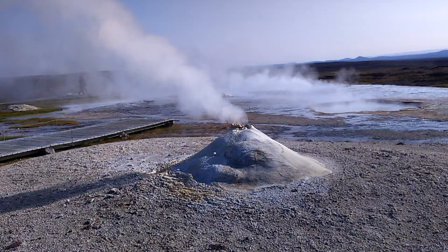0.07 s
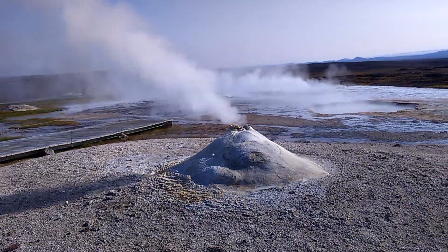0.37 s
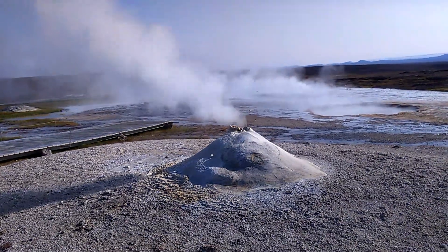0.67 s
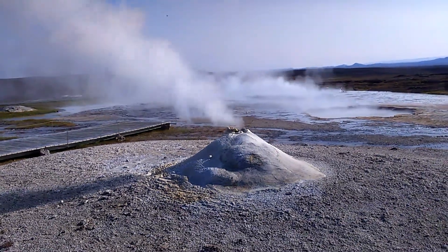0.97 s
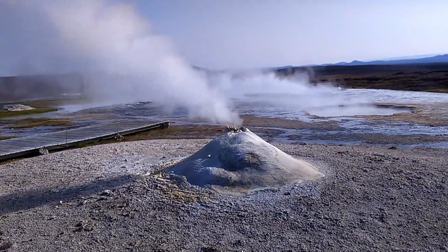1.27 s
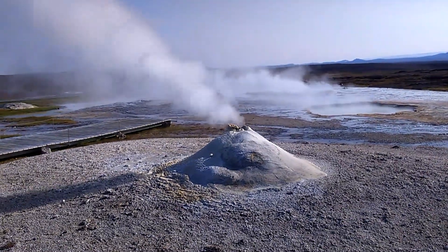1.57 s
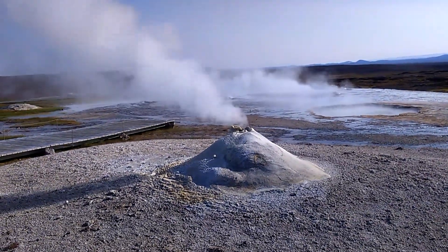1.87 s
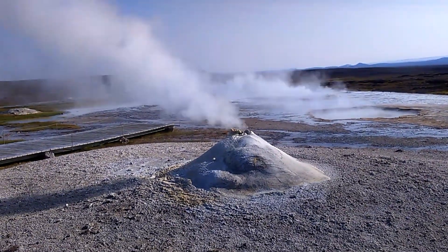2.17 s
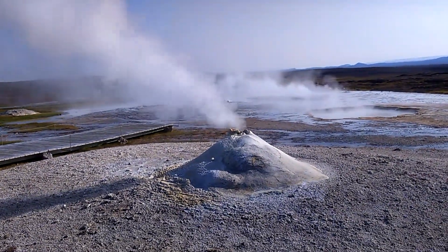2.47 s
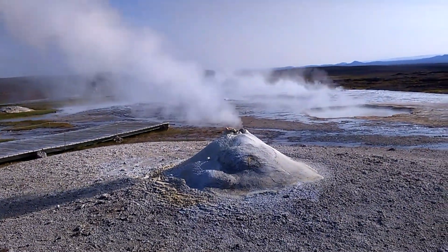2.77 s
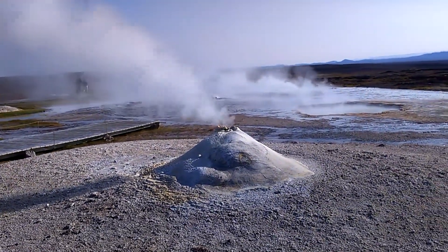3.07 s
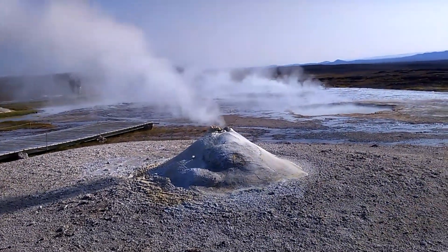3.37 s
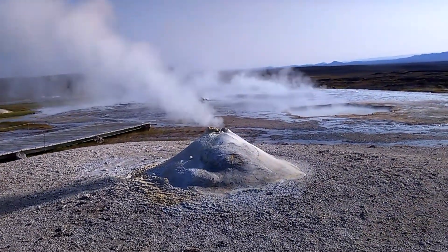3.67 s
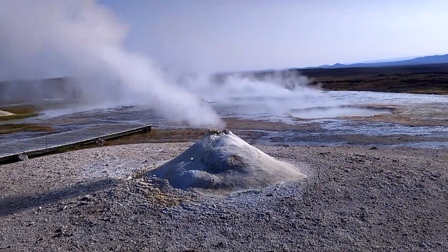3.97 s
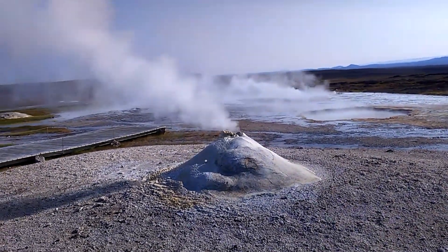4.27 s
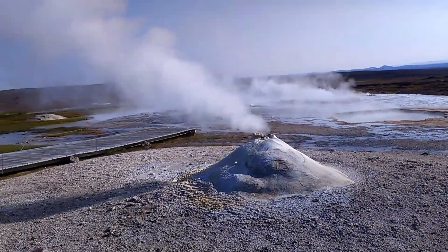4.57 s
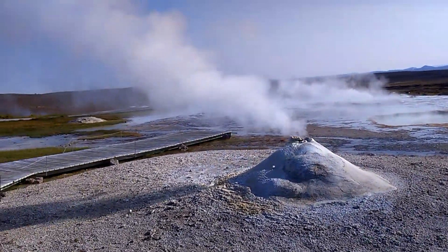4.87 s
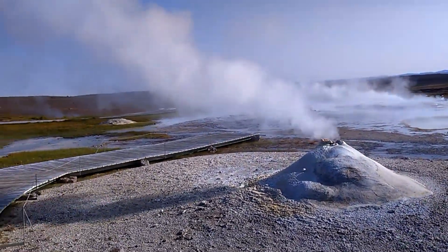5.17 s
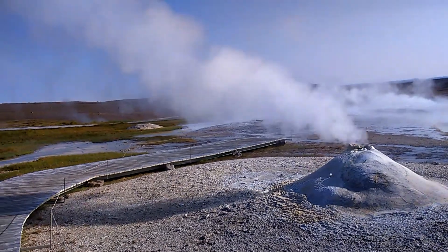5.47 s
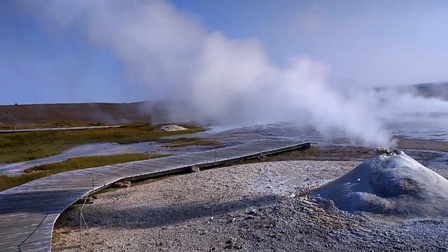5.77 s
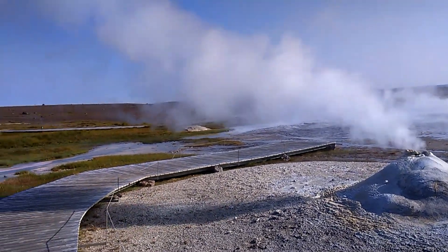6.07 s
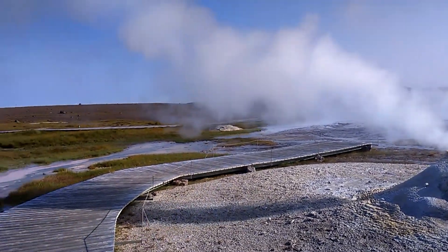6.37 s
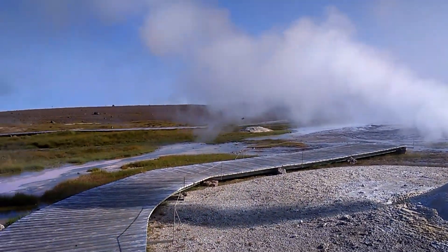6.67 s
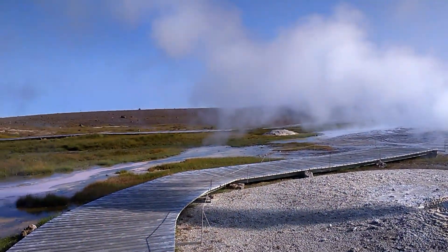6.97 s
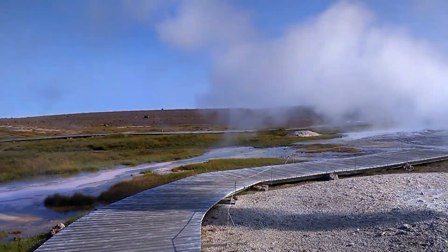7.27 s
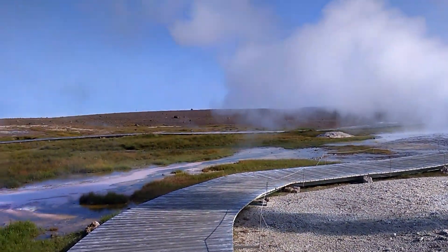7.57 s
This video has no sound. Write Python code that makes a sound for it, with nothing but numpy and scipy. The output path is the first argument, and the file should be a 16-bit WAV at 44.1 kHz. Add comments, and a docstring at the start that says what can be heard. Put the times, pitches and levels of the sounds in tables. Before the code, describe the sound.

Right from the start, steam rushes loudly out of a mineral cone in an open geothermal field, a few metres from the microphone. The body of the sound is a broad, steady midrange roar from the vent's throat, with a slightly hollow, pipe-like tint. A softer, even rumble from the plume lies beneath it. On top sits a fine, wet hiss with a faint, dense sputter of spray. The sound holds unchanged until about 4.5 seconds, when the microphone begins to turn away. From there to about 8 seconds the colour of the rush gradually shifts: the highest hiss thins, the rumble weakens a little and the pipe-like tint fades. The roar stays at nearly the same loudness and continues without a break to the end.

```python
"""An open geothermal field: steam rushes out of a mineral cone a few metres from the microphone.
The plume rumbles, the throat of the vent roars, and the wet jet hisses and sputters at the lip.
Past the middle the microphone turns away, which changes the colour of all three layers.
A fast limiter holds the level."""
import sys
import numpy as np
from scipy import signal
from scipy.fft import rfft, irfft, next_fast_len
from scipy.io import wavfile

SR = 44100
rng = np.random.default_rng(int(sys.argv[2]) if len(sys.argv) > 2 else 0)


def waveform_to_disk(signal):
    """Save audio, clipped to [-1, 1], as 16-bit WAV at the path in sys.argv[1]."""
    frames = np.transpose(np.atleast_2d(signal))
    scaled = np.clip(frames, -1, 1) * 32767
    samples = np.round(scaled).astype(np.int16)
    wavfile.write(sys.argv[1], SR, samples)


N = 345303
TIME = np.arange(N) / SR
FFT_SIZE = next_fast_len(N)
BIN_HZ = np.arange(FFT_SIZE // 2 + 1) * SR / FFT_SIZE


def from_db(db):
    """Decibels to gain."""
    return 10 ** (np.asarray(db) / 20)


def rms_one(x):
    """Scale to unit rms."""
    return x / np.sqrt(np.mean(x ** 2) + 1e-20)


def equalise(x, gains):
    """Filter x with one gain for each frequency bin."""
    return irfft(rfft(x, FFT_SIZE) * gains, FFT_SIZE)[:N]


def coloured(x, colour):
    """Shape x with an EQ curve of (Hz, dB) points, then scale it to unit rms."""
    hz, db = np.transpose(colour)
    gain_db = np.interp(np.log(np.maximum(BIN_HZ, 1)), np.log(hz), db)
    return rms_one(equalise(x, from_db(gain_db)))


def drift(rate_hz):
    """A smooth random wander of unit rms, mostly slower than rate_hz."""
    lowpass = 1 / (1 + (BIN_HZ / rate_hz) ** 2)
    return rms_one(equalise(rng.standard_normal(FFT_SIZE), lowpass))


def off_axis(flow, colours, turn):
    """Crossfade through a source's colours, spaced evenly from front to side, as the microphone turns."""
    position = turn * (len(colours) - 1)
    weights = [np.maximum(1 - np.abs(position - k), 0) for k in range(len(colours))]
    return sum(weight * coloured(flow, colour) for weight, colour in zip(weights, colours))


def plume_rumble(turn, level_db=-25, side_loss_db=2.5):
    """Large eddies above the cone lay down an even, low rumble that weakens in the turn."""
    # The rumble's colour, head-on and side-on. Each row: frequency in Hz, relative level in dB.
    front = [(15, -55), (25, -51), (59, -9), (96, -8), (140, -2), (198, -4.5), (233, -10), (315, -4),
             (377, -8), (407, -13), (472, -7.5), (591, -2), (719, -1.5), (860, -6.5), (900, -12),
             (1170, -35), (1980, -120)]
    side = [(15, -60), (25, -30), (96, -8), (158, -2), (227, -7), (252, -9.5), (271, -6.5), (301, -7.5),
            (377, -5), (465, -12.5), (487, -8.5), (763, -1), (900, -6), (1170, -20), (1980, -120)]
    rumble = off_axis(rng.standard_normal(N), [front, side], turn)
    return from_db(level_db - side_loss_db * turn) * rumble


def turbulence(eddies, depth_db):
    """Noise that swells with each passing eddy."""
    return rms_one(rng.standard_normal(N) * from_db(depth_db * eddies))


def droplets(surge, per_s, spread_db):
    """Water torn off the lip bursts in tiny clicks, more of them in a surge."""
    bursts = rng.random(N) < per_s * from_db(3 * surge) / SR
    sizes = from_db(spread_db * np.minimum(rng.exponential(1, N), 4))
    return rms_one(bursts * sizes * rng.choice([-1, 1], N))


def lip_hiss(turn, level_db=-27, swell_db=0.5):
    """Fine eddies and spray hiss at the rim; these short waves change most in the turn."""
    # The hiss's colour, head-on, half turned and side-on.
    # Each row: frequency in Hz, relative level in dB.
    front = [(2800, -34), (3600, -12), (3800, -5), (4500, -1.5), (4750, -6.0), (5200, -6.0), (5600, -0.5),
             (6500, -3.0), (7800, -0.5), (9000, -9.5), (10000, -9.5), (12000, -18), (13000, -32),
             (14200, -20.5), (15500, -41.5)]
    oblique = [(2800, -34), (3600, -10), (4200, 0.5), (4950, -3.0), (5400, -1), (5800, -5), (6250, -19),
               (6700, -13), (7100, -10), (7700, -5), (8900, -11.5), (10400, -8.5), (12500, -21.5),
               (15500, -28.5)]
    side = [(2800, -35), (3600, -8), (4200, -0.5), (4850, -4), (5350, 0.0), (5950, -3.5), (6450, -15),
            (7500, -14), (8100, -13.5), (8800, -23), (10700, -14.5), (12200, -23), (13000, -37.5),
            (14200, -26), (15500, -45.0)]
    surge = drift(rate_hz=14)
    eddies = surge + 0.45 * drift(rate_hz=75)
    steam = turbulence(eddies, depth_db=0.4)
    spray = from_db(-12) * droplets(surge, per_s=2000, spread_db=1.0)
    gain = from_db(level_db + swell_db * drift(rate_hz=3.7))   # slight, slower swells
    return gain * off_axis(steam + spray, [front, oblique, side], turn)


def throat_roar(turn, level_db=-13):
    """The steady flow drives the broad resonances of the vent's mouth: the body of the sound."""
    # The roar's colour, head-on, half turned and side-on.
    # Each row: frequency in Hz, relative level in dB.
    front = [(200, -90), (750, -31), (900, -13), (1020, -7.5), (1280, -3.0), (1650, -1.0), (1780, -2.5),
             (1850, -7.5), (1980, -6), (2250, 0.5), (2450, -2.5), (2650, -7.5), (2880, -9), (3120, -17),
             (3600, -19.5), (6500, -96)]
    oblique = [(200, -90), (750, -38), (900, -13), (1100, -6.5), (1230, -1), (1550, 0), (1880, 1),
               (2100, -2), (2330, 1), (2550, -3.5), (2750, -10), (3000, -12), (3250, -19.5), (3600, -19.5),
               (6500, -90)]
    side = [(200, -90), (750, -29), (900, -17), (1130, -11), (1260, -3.5), (1500, -3.0), (1800, -2.5),
            (2100, 1), (2400, -1.0), (2600, -4), (2800, -7.5), (3000, -13.5), (3150, -14), (3600, -26.5),
            (6500, -90)]
    return from_db(level_db) * off_axis(rng.standard_normal(N), [front, oblique, side], turn)


def pipe_colour(steam, turn):
    """Narrow peaks and hollows make the rush slightly pipe-like; the tint fades off axis."""
    # Bell-shaped EQ bands, heard facing the vent. Each row: centre in Hz, width in Hz, gain in dB.
    bells = [(245, 30, -1), (327, 50, 0.5), (430, 40, -1.5), (634, 58, 2.2), (2205, 100, -0.3),
             (4740, 90, -5), (4960, 150, 2.5), (5060, 100, -7)]
    gain_db = sum(db * np.exp(-(2 * (BIN_HZ - hz) / width) ** 2) for hz, width, db in bells)
    tinted = equalise(steam, from_db(gain_db))
    return (1 - turn) * tinted + turn * steam


def scene(start_s=0.105):
    """Rumble, roar and hiss of one steady jet, heard in mono through a turning microphone."""
    # The microphone's move. Each row: time in seconds, turn from 0 (facing the vent) to 1 (side-on).
    turn_points = [(0, 0.03), (4.3, 0), (4.7, 0.12), (5.1, 0.35), (5.5, 0.5), (6.0, 0.56), (6.5, 0.79),
                   (7.1, 0.92), (7.8, 1.0)]
    turn = np.interp(TIME, *np.transpose(turn_points))
    steam = plume_rumble(turn) + throat_roar(turn) + lip_hiss(turn)
    fade_in = np.clip((TIME - start_s) / 0.001, 0, 1)   # the sound cuts in over 1 ms
    return (pipe_colour(steam, turn) * fade_in)[None]


def limiter(x, threshold_db, release_db_per_s, attack_s):
    """Peaks over the threshold pull the gain down at once; it recovers steadily."""
    over_db = np.maximum(20 * np.log10(np.abs(x) + 1e-9) - threshold_db, 0)
    release_db = release_db_per_s * TIME
    held_db = np.maximum.accumulate(over_db + release_db, axis=-1) - release_db
    pole = np.exp(-1 / (attack_s * SR))
    reduction_db = signal.lfilter([1 - pole], [1, -pole], held_db)
    return x * from_db(-reduction_db)


def record(dry):
    """The recorder limits the loud jet, adds its faint noise and cuts the top."""
    limited = limiter(dry * from_db(1.0), threshold_db=-7.0, release_db_per_s=902, attack_s=0.0002)
    noise_floor = from_db(-84) * rng.standard_normal(N)
    high_cut = signal.ellip(10, 0.1, 80, 15700, fs=SR, output="sos")   # steep above 15.7 kHz
    return signal.sosfilt(high_cut, limited + noise_floor)


dry = scene()
out = record(dry)
waveform_to_disk(out)
```